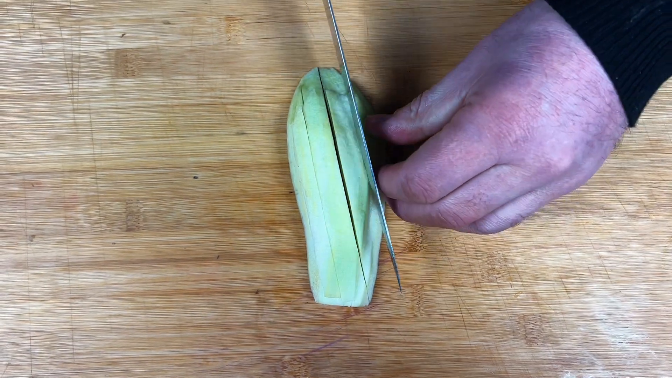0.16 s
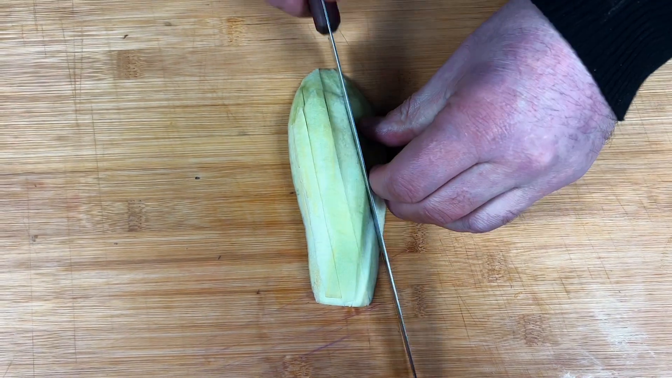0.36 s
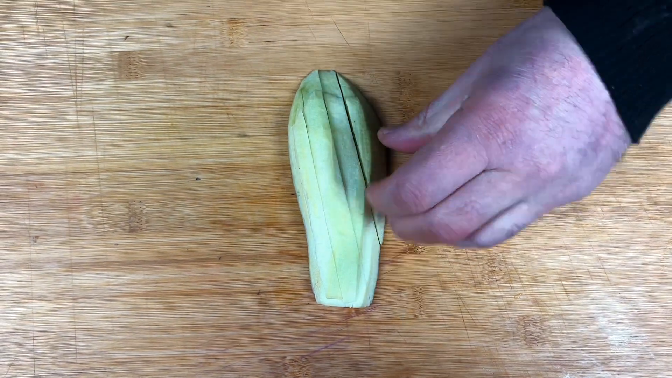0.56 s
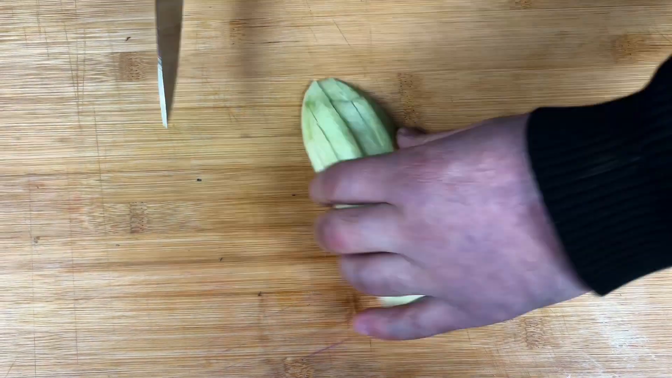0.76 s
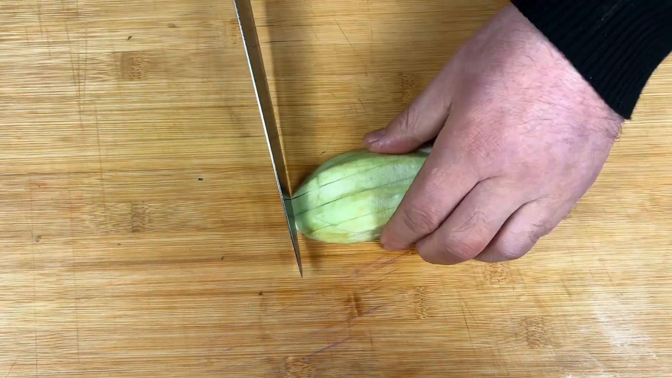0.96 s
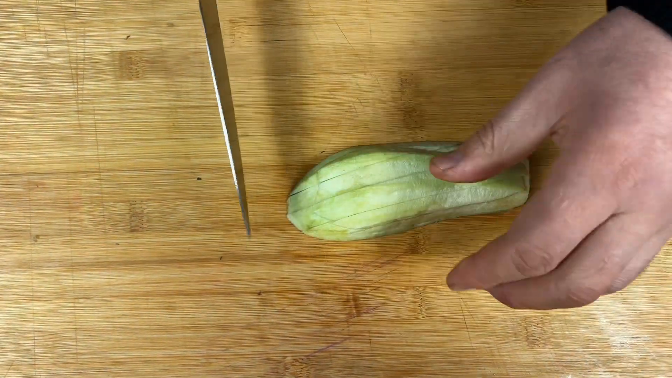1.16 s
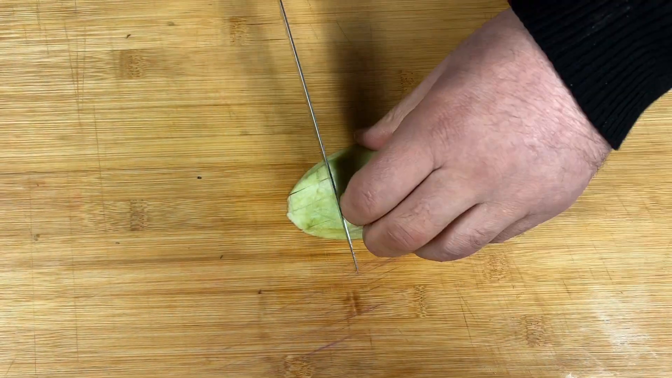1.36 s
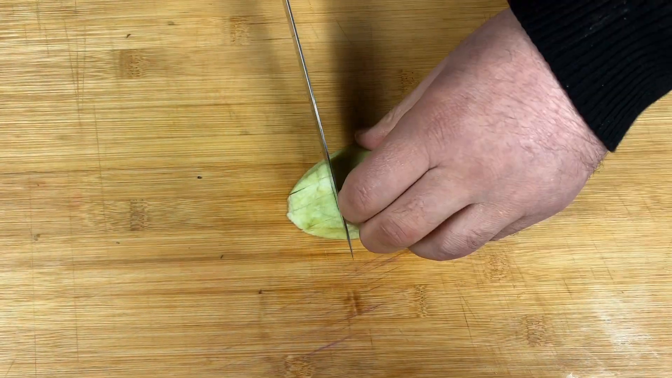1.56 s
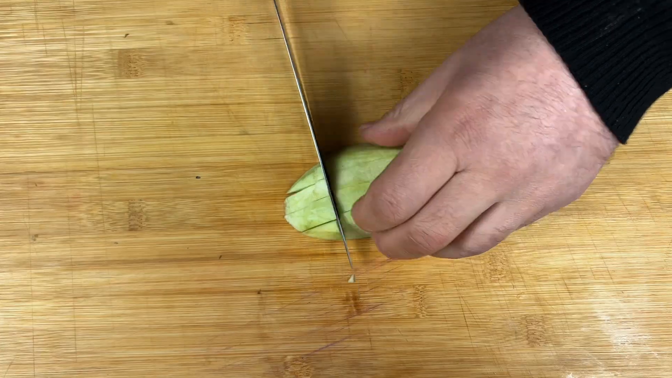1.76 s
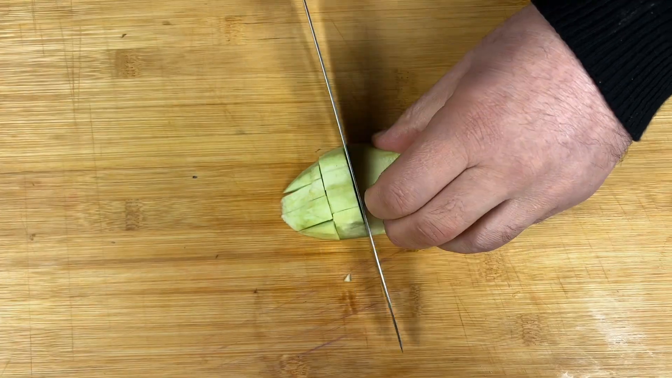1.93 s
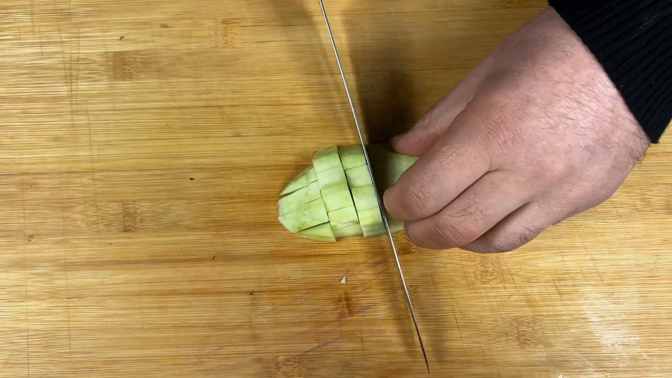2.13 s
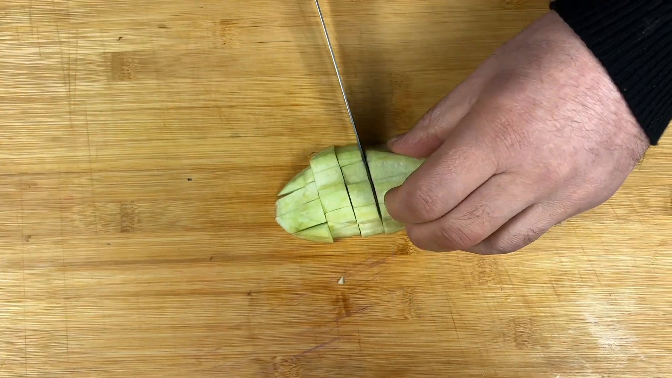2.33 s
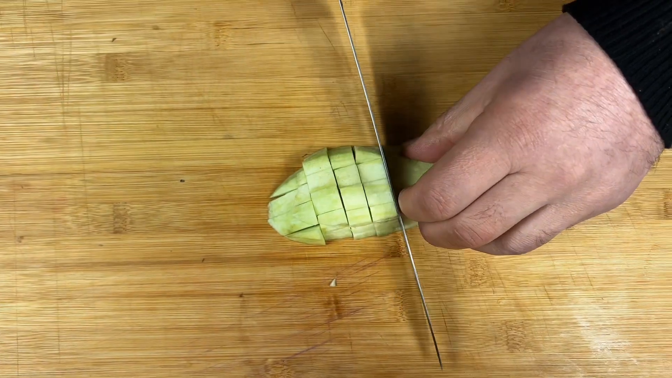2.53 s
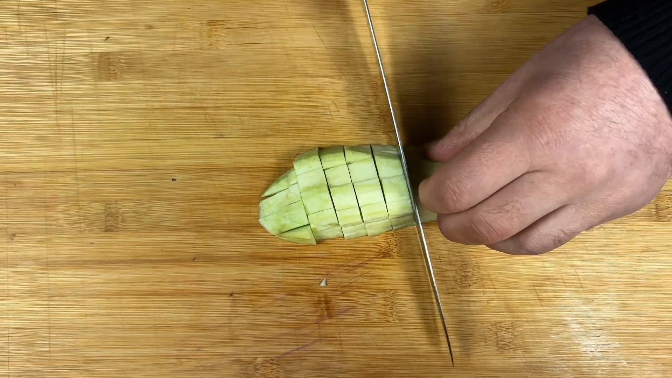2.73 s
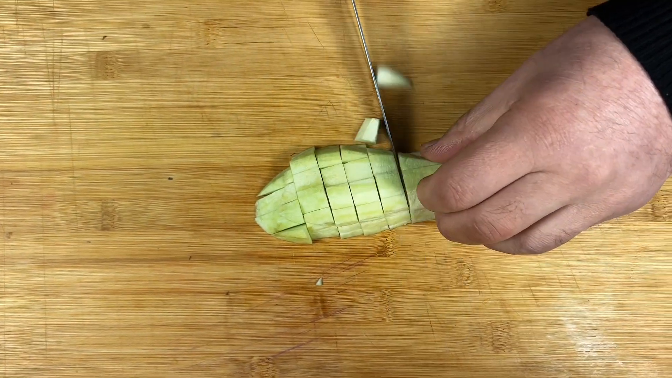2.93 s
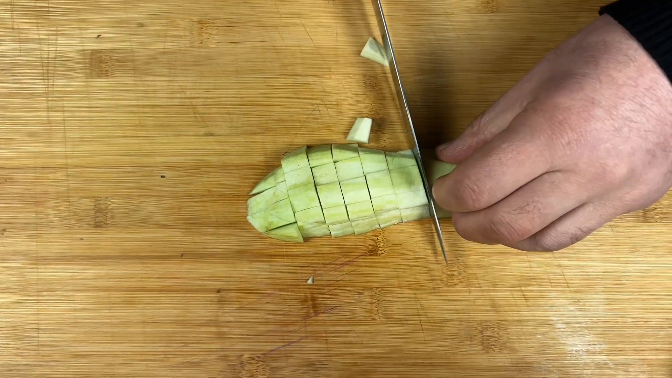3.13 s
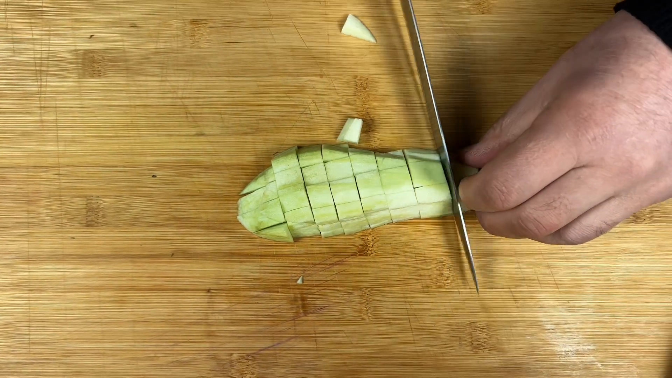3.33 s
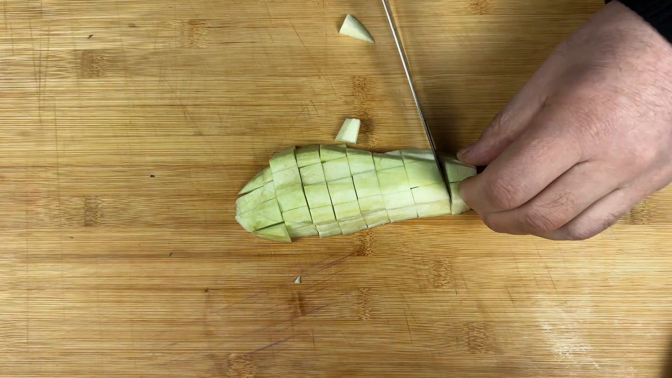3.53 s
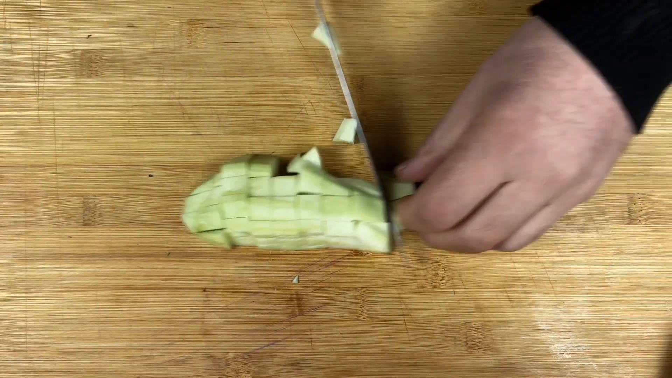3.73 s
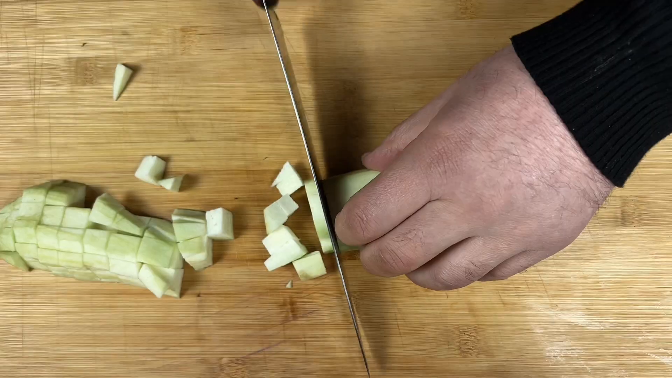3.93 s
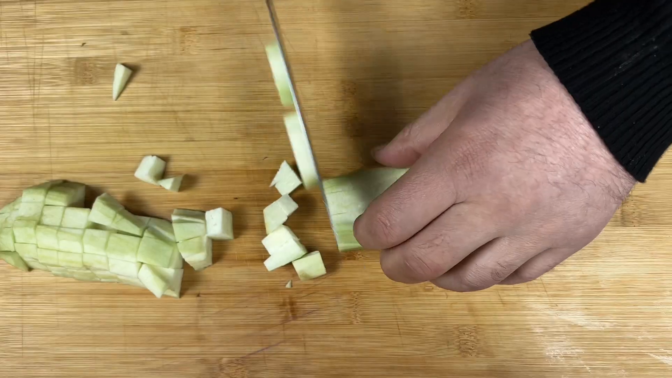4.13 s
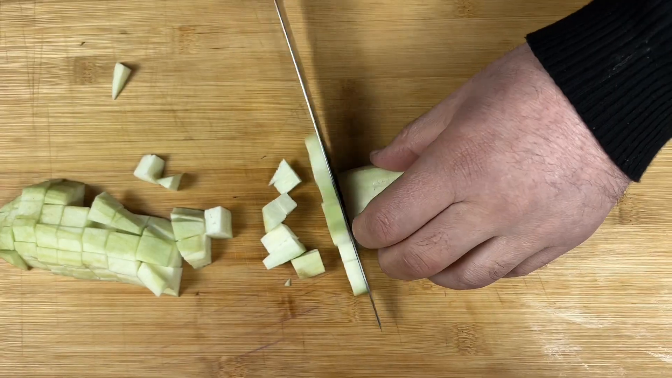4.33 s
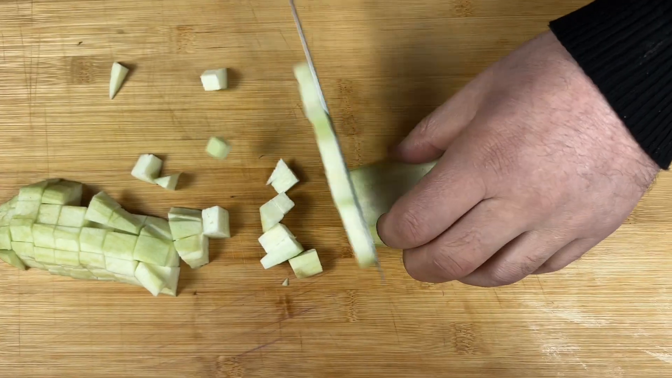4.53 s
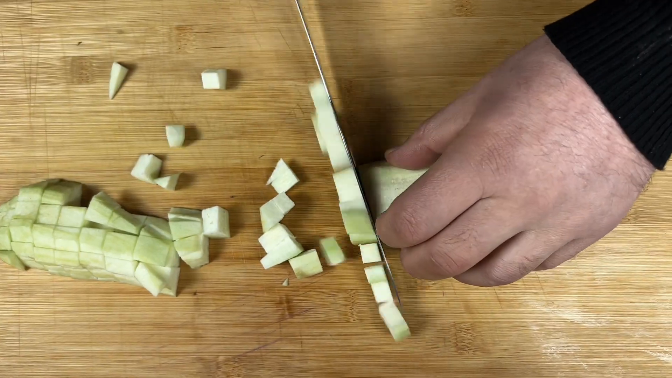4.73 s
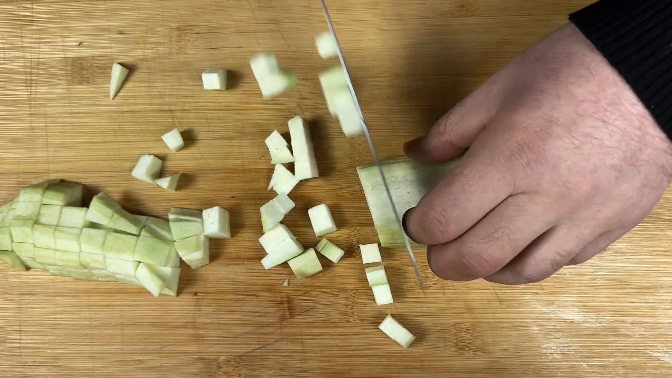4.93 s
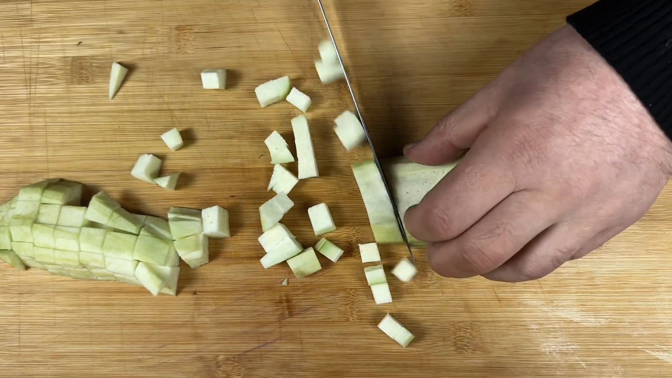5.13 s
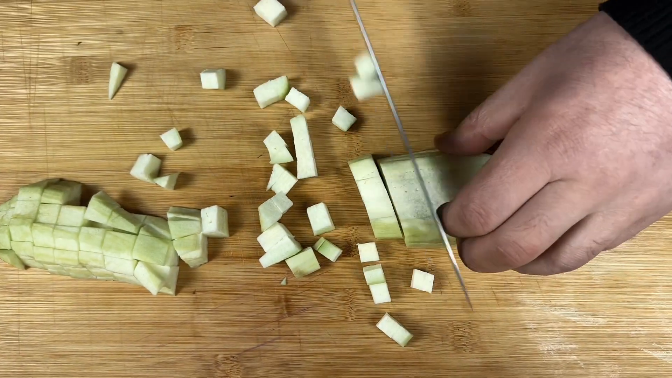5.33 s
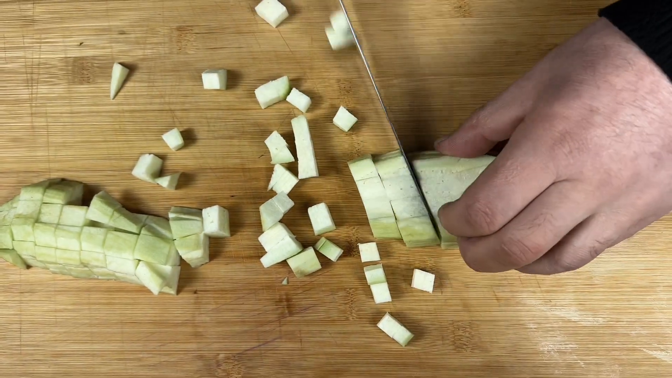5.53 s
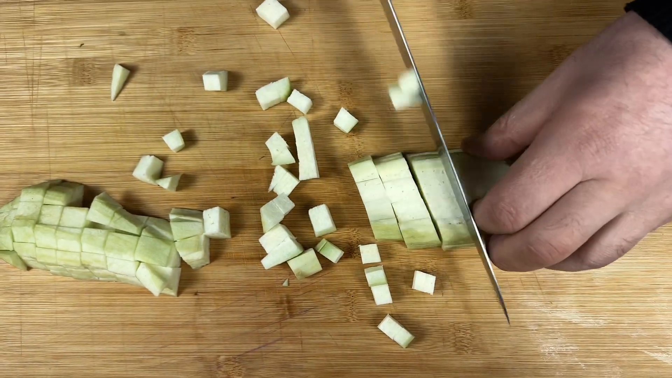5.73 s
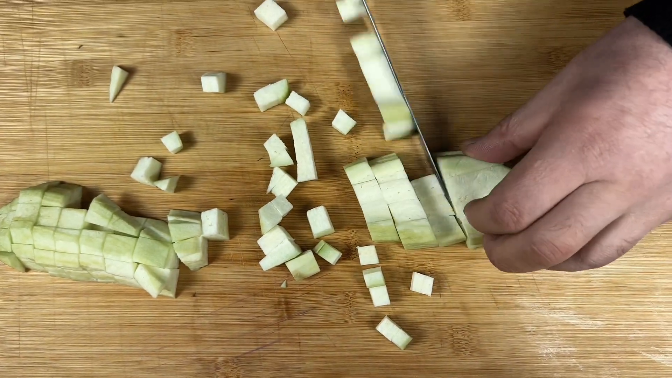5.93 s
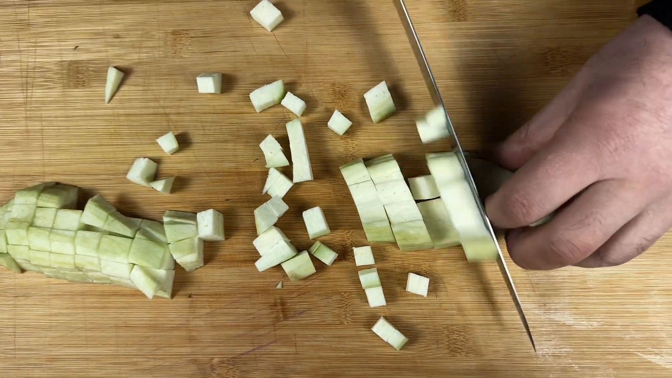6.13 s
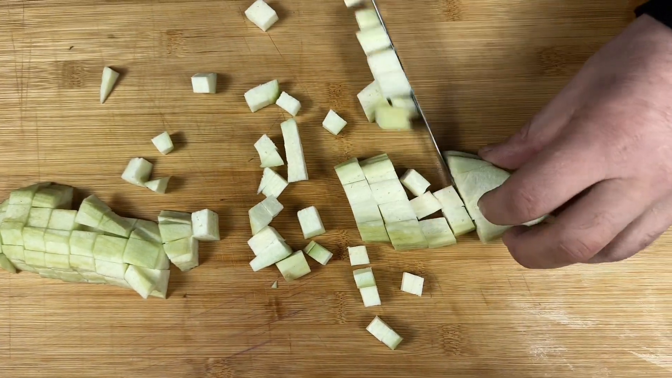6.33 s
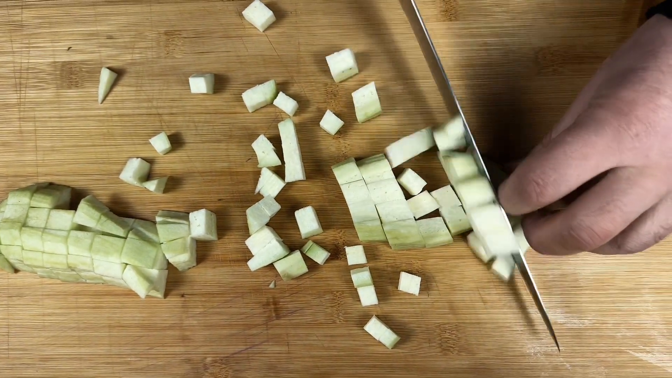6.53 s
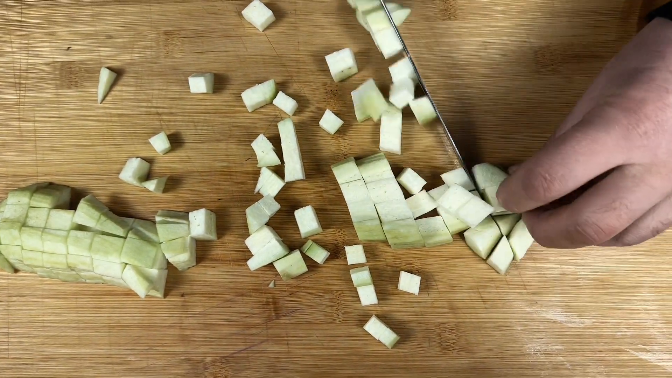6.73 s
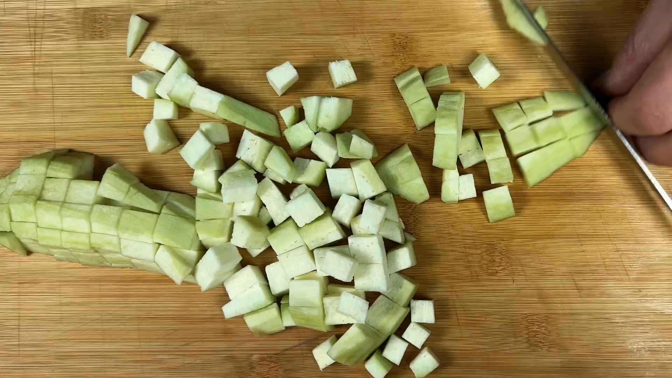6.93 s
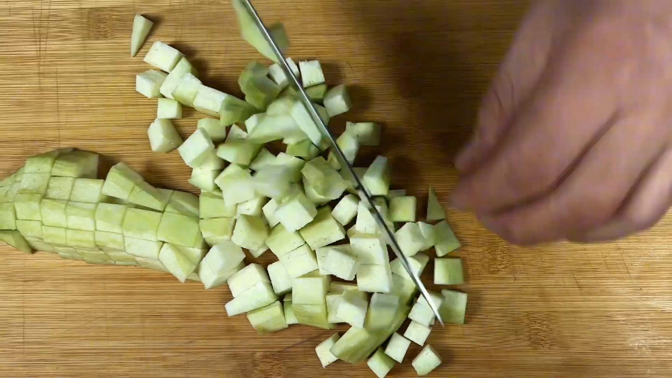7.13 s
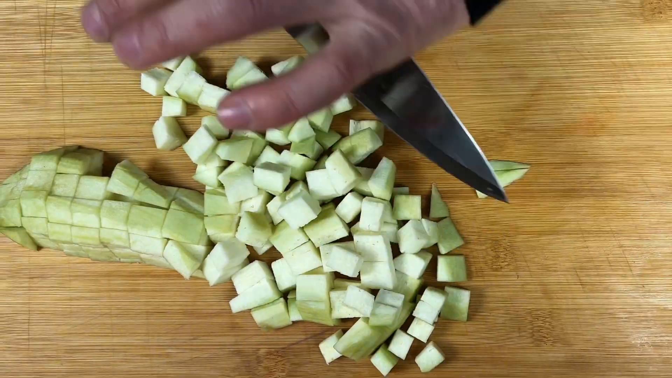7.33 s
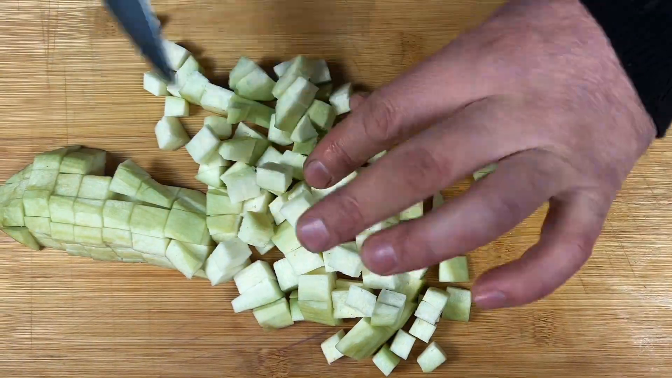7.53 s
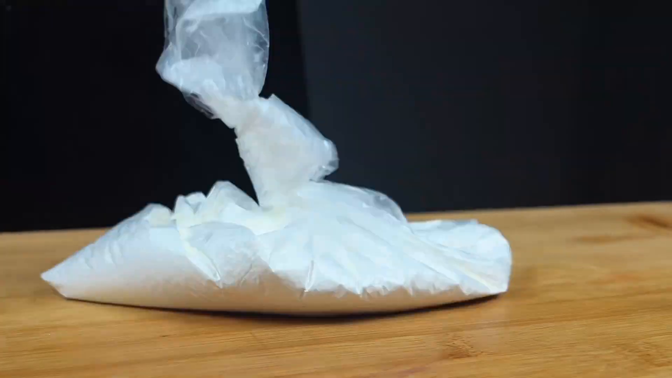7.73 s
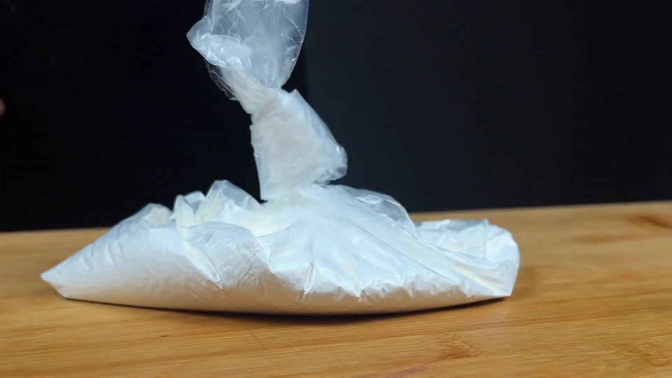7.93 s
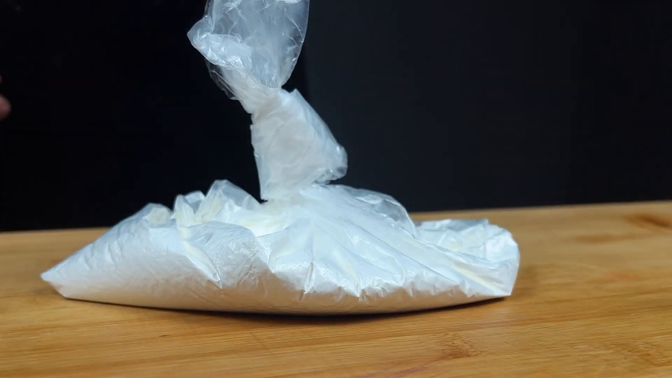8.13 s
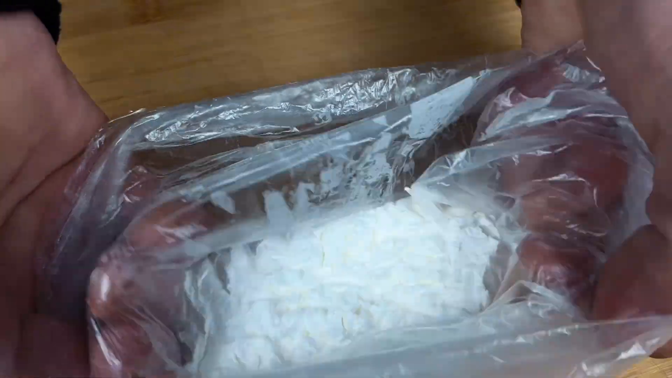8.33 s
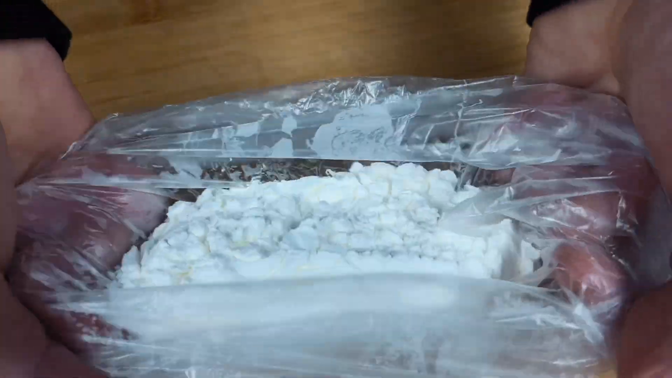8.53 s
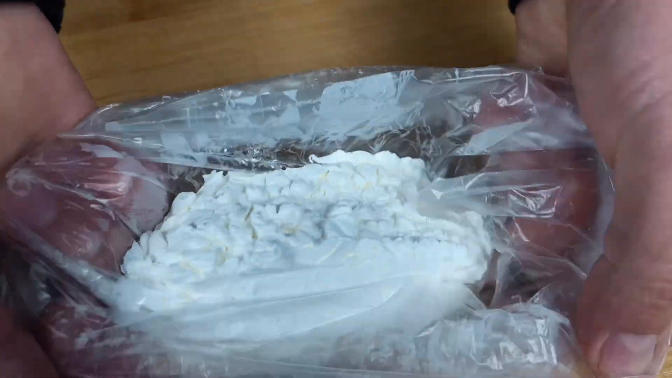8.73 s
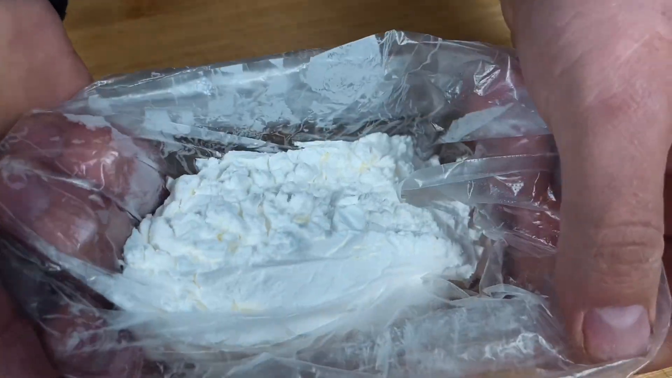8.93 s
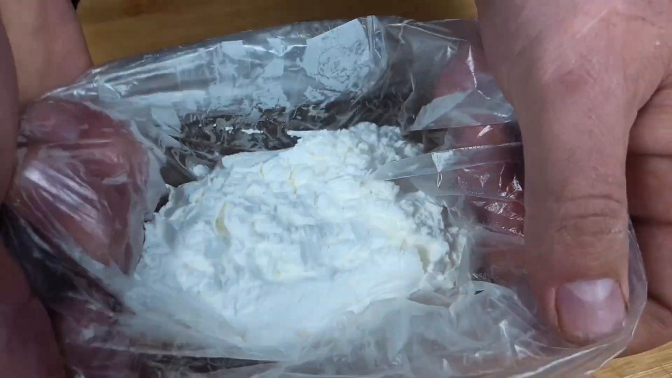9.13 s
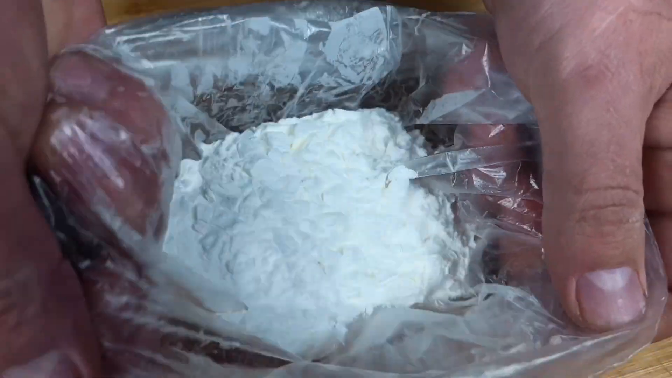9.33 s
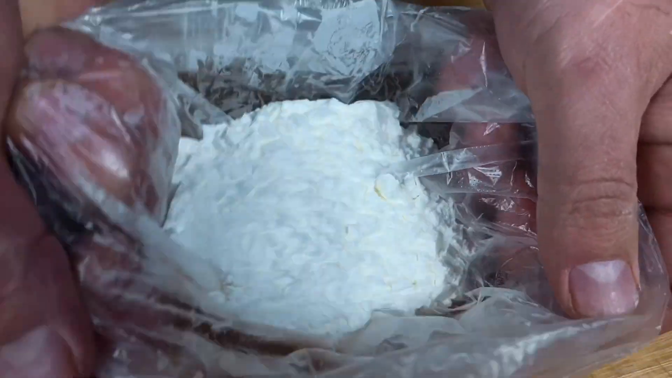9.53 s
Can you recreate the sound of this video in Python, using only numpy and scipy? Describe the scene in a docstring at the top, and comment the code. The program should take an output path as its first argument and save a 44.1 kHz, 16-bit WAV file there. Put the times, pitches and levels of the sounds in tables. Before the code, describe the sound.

A knife chops a vegetable on a wooden board, knocking sharply and rasping between cuts, then a soft bag thumps down and plastic crinkles close by.

```python
"""A knife slices a peeled vegetable on a wooden board in a quiet kitchen: the blade bites, knocks on the wood,
bounces and rasps back along the grain. Then a plastic bag of soft curd drops on the board,
and close by two hands spread the bag open. A spaced pair of microphones listens.
Knocks are ringing modes set off by clicks; rasp, rustle and crinkle are random grains, coloured and swelled.
Low shaking, a short kitchen echo and steady room air lie underneath."""
import sys
import numpy as np
from scipy import signal
from scipy.fft import rfft, irfft, next_fast_len
from scipy.io import wavfile

SR = 44100
rng = np.random.default_rng(int(sys.argv[2]) if len(sys.argv) > 2 else 0)


def wav_out(sig):
    """Save sig, one row per channel (or a flat mono array), as 16-bit PCM at SR to the path in sys.argv[1]."""
    wavfile.write(sys.argv[1], SR, np.round(np.clip(np.atleast_2d(sig).T, -1, 1) * 32767).astype(np.int16))


N = 426447
TIME = np.arange(N) / SR
STEPS = np.arange(0, N / SR + .01, .001)   # coarse clock for levels, in seconds
CUTOFF_HZ = 15900   # top of the sound
SHARP_FROM_HZ, DEEP_BELOW_HZ = 800, 250   # where the board's high modes begin and its lowest end
DROP_S = 7.669   # the bag hits the board

# Ways the board rings: [pitch_hz, level_db, t60_s, left_minus_right_db, left_leads_radians]
BOARD = [(178.6, -16.5, 0.38, 5.5, -0.5), (218, -13.5, 0.2, 6, -1), (311, -12, 0.11, -1, 1.1),
         (356.2, -0.5, 0.076, -2, 0.17), (382, 6.5, 0.027, 0.7, 0.13), (440, -11.5, 0.031, -3.5, -0.6),
         (446.2, -3, 0.1, 7, -0.07), (547, -14.5, 0.018, -12, 6.5), (712, 2, 0.045, -6, 4),
         (920, -3, 0.083, -5.5, -3), (1170, 3, 0.021, 11, -0.7), (1227, -4, 0.015, 4, -1.5),
         (1340, 0, 0.04, -2, 4), (1654, -3, 0.059, -6.5, -2.5), (2060, -4.5, 0.022, -2, -3),
         (2128, 4, 0.017, -2.5, 1), (2520, -9.5, 0.035, -4, 5), (3090, -10.5, 0.015, -3.5, 8),
         (3680, -16.5, 0.011, 0.5, -1)]
# Level of the board's lowest modes over time: [time_s, level_db]
DEPTH = [(0, -5.5), (1, -10), (1.7, -6.5), (2.2, 6.5), (2.8, -2), (3.3, 1), (3.8, 7.5), (4.3, -3),
         (5.4, -2.5), (6.2, 1.5), (6.6, -1.5), (7.5, 3)]
# Colour of a crack of steel edge on wood: [pitch_hz, relative_level_db]
CRACK = [(700, -30.5), (1500, -5.5), (3500, -2), (5000, -23), (8000, -34.5), (15500, -42)]
# The last fibres give way, the blade lands and grinds on the wood: [time_s, rise_s, fall_s (before its shares),
# rasp_db, keen_rasp_over_rasp_db, board_shudder_db, blade_hiss_db, table_shake_db]
LANDINGS = [(0.318, 0.027, .15, -29.5, -0.5, -27, -46, -61.5),
            (0.945, 0.023, 0.089, -44.5, -30, -40, -46, -67.5),
            (1.677, 0.026, 0.13, -26.5, -1, -21, -49, -67.5),
            (1.894, 0.007, 0.22, -22.5, -2.5, -20, -63, -51),
            (2.196, 0.0073, 0.32, -28.5, -7.5, -27, -51, -52),
            (2.524, 0.014, 0.21, -23, -12, -23, -51, -45),
            (2.786, 0.032, 0.24, -37, -32.5, -22, -75, -61.5),
            (3.011, 0.0036, 0.24, -22.5, -15, -14.5, -59, -48.5),
            (3.334, 0.0099, 0.31, -26.5, 2, -23, -44.5, -43.5),
            (4.306, 0.028, 0.14, -24, -11, -19.5, -37, -55),
            (4.634, 0.014, 0.13, -27, -3.5, -15.5, -72.5, -60),
            (5.032, 0.02, 0.055, -23.5, -15, -27, -66.5, -59),
            (5.404, 0.013, 0.13, -24, -17, -21, -63, -61), (5.792, 0.027, 0.1, -24.5, -25, -22, -56, -65),
            (6.202, 0.019, 0.19, -29.5, 7.5, -21, -42, -58),
            (6.608, 0.019, 0.088, -21.5, -12.5, -19.5, -47, -54)]
# Hands spread the bag: [time_s, crinkle_db, dull_handling_db]
SPREAD = [(8.149, -27.5, -40), (8.191, -25.5, -38.5), (8.347, -25, -41.5), (8.373, -18.5, -38.5),
          (8.385, -24, -37.5), (8.419, -30.5, -42.5), (8.521, -32.5, -49.5), (8.571, -28.5, -43),
          (8.657, -30, -44.5), (8.703, -29, -39), (8.741, -33, -46), (8.915, -36.5, -52), (8.999, -30, -42),
          (9.097, -33, -46), (9.121, -28, -40), (9.173, -36.5, -47.5), (9.245, -29.5, -40),
          (9.271, -34.5, -45.5), (9.309, -29.5, -45), (9.341, -35.5, -41), (9.367, -38.5, -50),
          (9.423, -29.5, -38), (9.447, -34, -45), (9.495, -30, -43.5), (9.557, -37.5, -48),
          (9.605, -27, -36), (9.639, -33, -40), (9.67, -29.5, -45)]


def from_db(db):
    """Decibels to gain."""
    return 10 ** (np.asarray(db) / 20)


def rms_one(x):
    """Scale to an rms of 1, over all channels together."""
    return x / np.sqrt(np.mean(x ** 2) + 1e-20)


def gains(rows):
    """Turn level columns into gains over time, practically silent outside the table."""
    s, *columns = np.transpose(rows)
    return [from_db(np.interp(TIME, s, c, left=-150, right=-150)) for c in columns]


def at_hz(points, hz):
    """Read a table at any pitch, along a log-frequency axis."""
    table_hz, values = np.array(points)[:, 0], np.array(points)[:, 1]
    return np.interp(np.log(hz), np.log(table_hz), values)


def swell(start, hold, rise, fall, bend=1):
    """Level in dB below full: rise up to the start, hold, fall; each time spans 30 dB if bend is 1."""
    early = np.maximum(start - STEPS, 0) / rise
    late = np.maximum(STEPS - start - hold, 0) / fall
    return -30 * (early + late) ** bend


def summed(levels_db):
    """Add levels as powers and return the gain at every sample."""
    return np.interp(TIME, STEPS, np.sqrt(np.sum(from_db(levels_db) ** 2, axis=0)))


def band(x, low_hz, high_hz):
    """Steep band-pass."""
    return signal.sosfilt(signal.butter(4, [low_hz, high_hz], "band", fs=SR, output="sos"), x)


def read_at(x, samples):
    """Read between samples."""
    return np.interp(samples, np.arange(N), x)


def ring(clicks, hz, t60):
    """A unit click sets a fading sine of starting height 1 ringing."""
    r, w = 1000 ** (-1 / (t60 * SR)), 2 * np.pi * hz / SR
    return signal.lfilter([0, np.sin(w)], [1, -2 * r * np.cos(w), r * r], clicks + 1e-18)


def drift(rate):
    """Slow random wandering of spread 1, made at every 40th sample; rate in Hz."""
    r = np.exp(-80 * np.pi * rate / SR)
    slow = signal.lfilter([1], [1, -2 * r, r * r], rng.standard_normal(N // 40 + 2002))[2000:]
    return np.interp(np.arange(N) / 40, np.arange(len(slow)), rms_one(slow))


def grains(per_s, spread_db, clump_db, smooth):
    """Two draws of random clicks of uneven size that come in clumps, over a share of smooth noise."""
    sizes = from_db(spread_db * np.minimum(rng.exponential(1, (2, N)), 5)) * rng.choice([-1, 1], (2, N))
    clumps = from_db(np.clip(clump_db, 0, 2.5) * drift(35))
    clicks = sizes * (rng.random((2, N)) < per_s / SR) * clumps
    return rms_one(clicks) + smooth * rng.standard_normal((2, N))


def coloured(pair, spectrum):
    """Shape two draws by a spectrum; bass is alike at both microphones, treble is not; rms 1."""
    # Likeness of left and right, held between 0 and 1 below: [pitch_hz, likeness (no unit)]
    likeness = [(60, 1), (180, 0.73), (550, 0.17), (1650, -1.3), (4970, -0.13), (15000, -0.13)]
    size = next_fast_len(N)
    hz = np.maximum(np.arange(size // 2 + 1) * SR / size, 1)
    alike = np.clip(at_hz(likeness, hz), 0, 1)
    mid, side = rfft(pair, size) * from_db(at_hz(spectrum, hz))
    both = np.sqrt(1 + alike) * mid + np.sqrt(1 - alike) * side * [[1], [-1]]
    return rms_one(irfft(both, size)[:, :N])


def patchy(x, low_hz, depth_db, rate):
    """Nine bands, each a third of an octave wide, from low_hz up swell and fade in their own time."""
    edges = low_hz * 2 ** np.arange(0, 3.1, 1 / 3)
    out = x
    for low, high in zip(edges, edges[1:]):
        part = signal.sosfilt(signal.butter(1, [low, high], "band", fs=SR, output="sos"), x)
        out = out + (from_db(depth_db * drift(rate)[-x.shape[1]:]) - 1) * part
    return rms_one(out)


def blows():
    """Each blow rings the board; sharp ones wake the high modes more, and the steel edge adds a crack."""
    # Blows on the board: [time_s, relative_peak_db, sharpness_db, left_minus_right_db]
    blow_rows = [(0.322, -8.5, -1.5, -7), (0.339, -31.5, -1.5, 1.5), (0.736, -42.5, -22, -9),
                 (0.932, -32, -17, 3), (0.938, -23.5, -22, 6), (0.946, -18, -21, 10.5),
                 (1.054, -45.5, -27, 1.5), (1.069, -54, -22, 0), (1.133, -65, -27, 0),
                 (1.148, -54, -25, -2), (1.164, -51, -14, -5), (1.678, -7.5, -5.5, -8),
                 (1.893, -4.5, -1, -7), (1.91, -10.5, -19, -2.5), (2.188, -19, -1, 11),
                 (2.523, -3, -4.5, -3.5), (2.542, -11.5, -11.5, 5), (2.785, -16, -16.5, 3.5),
                 (2.812, -15.5, -16, 0), (3.012, -5.5, 0, 6), (3.031, -12, -16, -2.5), (3.339, -11, 7, -3),
                 (3.361, -13, -25, -4), (3.796, -39.5, -17.5, -3), (3.812, -38.5, -8, 0),
                 (3.874, -42, -22, 4.5), (3.903, -38, -6, 1), (3.924, -31, -15, 3), (3.944, -27.5, -8, 2),
                 (4.213, -37.5, -28, 10), (4.307, -7.5, -1, 6), (4.557, -34.5, -16, 2),
                 (4.635, -4.5, -2.5, -2), (4.653, -25.5, -10, 6), (4.966, -28, -19, -6),
                 (5.032, -9, -4.5, -1.5), (5.05, -22.5, -22, -12), (5.355, -38, -26, 4),
                 (5.409, -6.5, -1.5, 0.5), (5.422, -26, -48, 5), (5.737, -46, -10, -10),
                 (5.791, -13.5, -16.5, 3), (5.8, -17, -6, 1), (6.116, -35, -30, -1.5),
                 (6.198, -19.5, -5, 12), (6.211, -10, 0, 8), (6.61, -12.5, -11.5, 1), (6.892, -35.5, 3, 8),
                 (6.98, -34.5, -5.5, -12), (7.486, -49, -29.5, 7.5)]
    s, peak_db, sharp_db, pan_db = np.transpose(blow_rows)
    at, out = np.round(s * SR).astype(int), np.zeros((2, N))
    sides = from_db(np.outer([.5, -.5], pan_db))
    luck = rng.standard_normal((len(at), len(BOARD), 3))
    depth = gains(DEPTH)[0][at]
    soft = np.exp(-1 / (0.00045 * SR))   # the flesh cushions the low push, which builds up later
    for k, (hz, level_db, t60, lean_db, lead) in enumerate(BOARD):
        high = hz > SHARP_FROM_HZ
        # each blow wakes the high modes in its own measure, by 2.5 dB or so
        strength = from_db(peak_db + level_db + high * (sharp_db - 1.0) + 2.5 * high * luck[:, k, 0])
        if hz < DEEP_BELOW_HZ:
            strength = strength * depth
        turn = lead + hz / 1800 * luck[:, k, 1]   # radians; each mode radiates its own way
        shift = np.round(turn * SR / (4 * np.pi * hz)).astype(int)   # half the lead, for either side
        lean = from_db(lean_db * np.array([.5, -.5]))
        clicks = np.zeros((2, N))
        heights = 0.41 * strength * lean[:, None] * (sides if high else 1)
        clicks[0, at - shift], clicks[1, at + shift] = heights
        if not high:
            clicks = signal.lfilter([2.09 * (1 - soft) ** 2], [1, -2 * soft, soft ** 2], clicks)
        out += ring(clicks, hz, t60)
    cracks = np.zeros((2, N))
    cracks[:, at] = from_db(peak_db + sharp_db - 21.5) * sides
    fade = np.exp(-1 / (0.0032 * SR))   # the crack lasts a few milliseconds
    bright = coloured(rng.standard_normal((2, N)), CRACK)
    # keep the knocks lean below 245 Hz
    return band(out, 245, 6600) + signal.lfilter([1], [1, -fade], cracks) * bright


def strokes():
    """Flesh tearing under the blade shakes the low modes; the edge dragging on the grain rasps and hisses."""
    # Blade and board under friction: [pitch_hz, damping_per_s (higher rings shorter), level_db]
    resonances = [(674, 31, 4), (1104, 140, 3.5), (1480, 14, -16.5), (1865, 45, 2.5), (2198, 22, 1.5),
                  (2310, 54, -16), (2900, 74, -24.5), (3310, 62, -9.5), (3640, 180, -10),
                  (4500, 140, -20.5), (5200, 220, -15), (6000, 44, -21.5)]
    # Colour of the rasp under these resonances: [pitch_hz, relative_level_db]
    rasp_bed = [(350, -23), (600, -5.5), (1000, -4), (1500, -5), (2200, -3), (2900, -11), (3600, -17.5),
                (5000, -36.5)]
    # Colour of the blade's hiss: [pitch_hz, relative_level_db]
    hiss_colour = [(1800, -33), (2600, -10), (4200, -12), (5400, -11), (7200, -18), (9000, -20.5),
                   (12000, -29), (15500, -29.5)]
    # Hiss above 6 kHz against the rest of it: [time_s, level_db]
    treble = [(0, -1.5), (.5, -1.5), (1.7, 1), (2.1, -4.5), (2.7, 0.5), (3.2, -3.5), (3.6, -6.5), (4, 1.5),
              (4.35, -0.5), (4.75, 3), (5.15, -1), (5.5, 0.5), (5.9, 1), (6.3, 0.5), (6.7, 2.5), (6.95, 12),
              (7.6, -6)]
    rasp_gain, keen_gain, shudder_gain, hiss_gain = contact()

    tears = grains(400, spread_db=2.0, clump_db=0.0, smooth=0.13)
    tears = tears[0] + 0.14 * tears[1] * [[1], [-1]]
    depth, low = gains(DEPTH)[0], 0
    for hz, db, t60, *_ in BOARD:
        if hz < SHARP_FROM_HZ:
            low = low + from_db(db) * (depth if hz < DEEP_BELOW_HZ else 1) * ring(tears, hz, 1.1 * t60)

    drag = grains(1500, spread_db=1.5, clump_db=0.7, smooth=0.47)
    # the contact point travels along the blade, so each resonance sings out for a moment and glides
    singing = 0
    for hz, damping, db in resonances:
        moment = from_db(db + 4.0 * drift(7.3))
        # friction damps every resonance, so none goes below 50 per second
        singing = singing + moment * rms_one(ring(drag, hz, 7.5 / max(damping, 50)))
    glide = np.arange(N) + np.cumsum(.03 * drift(4.0))
    singing = rms_one(np.array([read_at(ear, glide) for ear in singing]))
    singing = rms_one(singing + .9 * streaks(drag))

    drag = patchy(coloured(drag, rasp_bed), 508, depth_db=2.0, rate=24) + 1.2 * singing
    dull, keen = band(drag, 410, 1500), band(drag, 1500, 4500)
    fine = coloured(grains(6500, spread_db=-3.0, clump_db=4.0, smooth=0.86), hiss_colour)
    fine = patchy(fine + 1.8 * band(singing, 2100, 4900), 1800, depth_db=1.5, rate=36)
    fine = fine + (gains(treble)[0] - 1) * band(fine, 6000, CUTOFF_HZ)
    shaken = shudder_gain * rms_one(band(low, 200, 610))
    return shaken + rasp_gain * rms_one(dull) + keen_gain * rms_one(keen) + hiss_gain * fine


def contact():
    """Bites, landings and slides set the gains of dull rasp, keen rasp, shudder and hiss."""
    # The blade bites into the flesh and presses down: [start_s, length_s, swell_db, rasp_db,
    # keen_rasp_over_rasp_db, board_shudder_db, blade_hiss_db]
    bites = [(0.248, 0.061, 14, -49, -18, -42, -50), (1.587, 0.076, 30, -48.5, -5, -34.5, -49),
             (1.879, 0.014, -3, -39.5, -1, -32, -49), (2.449, 0.064, 13.5, -46.5, -3, -32, -45),
             (4.196, 0.058, 15.5, -50.5, -2.5, -38.5, -52), (4.558, 0.057, 18.5, -51, -4, -33.5, -51.5),
             (4.961, 0.054, 2.5, -54, -12, -39, -53.5), (5.353, 0.059, 3, -51, -5, -41, -51),
             (5.739, 0.054, 6, -51.5, -3, -39, -49.5), (6.11, 0.055, 8.5, -53, -1, -43, -52.5),
             (6.493, 0.063, 15, -49, -0.5, -35, -48.5), (6.892, 0.11, 4.5, -44.5, -2, -40.5, -49)]
    # Blade or vegetable slides over the board: [fastest_at_s, rise_s, fall_s (both before the shares below),
    # rasp_db, keen_rasp_over_rasp_db, board_shudder_db, blade_hiss_db]
    slides = [(.114, 0.013, 0.08, -90, -4, -65, -97), (.5, 0.2, 0.19, -45.5, 5.5, -49, -43),
              (.735, 0.0058, 0.022, -75, -6.5, -48.5, -64), (.814, 0.11, 0.22, -63, -4, -58, -69),
              (1.062, 0.026, 0.036, -83, -13, -54, -90), (1.16, 0.05, 0.053, -78, 6, -64, -78),
              (1.812, 0.16, 0.15, -39.5, 1.5, -47, -46), (2.09, 0.3, 0.19, -37.5, 1.5, -44, -46.5),
              (2.33, 0.3, 0.22, -37, -3.5, -44, -43), (2.671, 0.24, 0.27, -40, -2.5, -41, -43),
              (2.899, 0.19, 0.28, -38, -3, -45, -42.5), (3.18, 0.25, 0.26, -41, 3, -42.5, -46),
              (3.44, 0.21, 0.43, -43, -2, -43, -57), (3.63, 0.11, 0.06, -65, 0, -42.5, -57),
              (3.836, 0.26, 0.38, -71, 5.5, -49, -58), (3.988, 0.18, 0.17, -39.5, -1, -49, -43.5),
              (4.36, 0.08, 0.18, -37.5, -7, -60, -48.5), (4.754, 0.24, 0.16, -42, -0.5, -53, -47),
              (4.93, 0.12, 0.082, -71.5, -1, -60, -86), (5.126, 0.19, 0.18, -41.5, 2.5, -52.5, -46.5),
              (5.519, 0.21, 0.17, -43.5, 3.5, -64, -49.5), (5.89, 0.19, 0.17, -43.5, 4, -51, -46.5),
              (6.269, 0.071, 0.22, -39.5, -0.5, -53, -52), (6.46, 0.051, 0.085, -74, -2, -58.5, -87),
              (6.676, 0.23, 0.15, -44.5, 2, -53, -50), (6.85, 0.099, 0.066, -66, -5, -56.5, -86),
              (7.077, 0.098, 0.064, -71, 4, -51.5, -77), (7.495, 0.028, 0.041, -76, -12, -50, -92),
              (7.545, .03, 0.067, -70.5, -9, -56.5, -96.5)]
    # Share of the fall after a landing: one value (no unit) each for dull rasp, keen rasp, shudder, hiss
    landing_fall = [1.0, 0.74, 0.4, .5]
    # Share of a slide's rise and fall: one value (no unit) each for the same four layers
    slide_width = [0.92, 0.82, 0.93, 0.75]
    roundness = 1.58   # 1 is a pointed swell, 2 a round one

    def level(k, rasp, keen, shudder, hiss):
        """Pick the level of layer k; keen rasp is given relative to rasp."""
        return [rasp, rasp + keen, shudder, hiss][k]

    result = []
    for k in range(4):
        layer = []
        for s, length, swell_db, *db in bites:
            grow = swell_db * (np.clip((STEPS - s) / length, 0, 1) - 1)
            layer.append(level(k, *db) + grow + swell(s, length, 0.005, 0.042))
        for s, rise, fall, *db, _ in LANDINGS:   # full pressure for 3.3 ms
            layer.append(level(k, *db) + swell(s, 0.0033, rise, fall * landing_fall[k]))
        for s, rise, fall, *db in slides:
            width = slide_width[k]
            layer.append(level(k, *db) + swell(s, 0, rise * width, fall * width, roundness))
        result.append(summed(layer))
    return result


def streaks(drag):
    """Many thin modes of the blade, each waking for a moment as the edge drags; strongest near 1.5 kHz."""
    out = 0
    for hz in np.geomspace(850, 5800, 23) * rng.uniform(.97, 1.03, 23):
        moment = from_db(5.5 * drift(7) - 6.0 * abs(np.log2(hz / 1500)))
        out = out + moment * rms_one(ring(drag, hz, .065))
    return rms_one(out)


def squeaks():
    """The wet blade sings: friction noise gathers in one narrow resonance, partly alike at both microphones."""
    # Moments of singing: [start_s, length_s, pitch_hz, level_db]
    songs = [(0.438, 0.011, 1570, -37.5), (.49, 0.074, 5300, -54), (.51, 0.058, 3500, -53),
             (2.048, 0.027, 2450, -39), (2.207, 0.017, 1170, -31), (2.302, 0.036, 3540, -45),
             (2.323, 0.013, 2870, -43), (2.368, 0.04, 2210, -44), (2.642, 0.052, 3550, -48),
             (2.673, 0.075, 1040, -38), (2.733, 0.0091, 2370, -41), (2.859, 0.023, 2100, -32),
             (2.968, 0.02, 1040, -38), (3.103, 0.015, 3100, -46), (3.163, 0.049, 3570, -48),
             (3.202, 0.045, 5100, -53.5), (5.484, 0.024, 2200, -39.5), (5.868, 0.048, 2170, -47)]
    edge_s, ring_s = 0.025, 3.6 / 260
    out, noise = np.zeros((2, N)), rng.standard_normal((2, N))
    noise = noise[0] + 0.47 * noise[1] * [[1], [-1]]
    for s, length, hz, db in songs:
        near = slice(round((s - .1) * SR), round((s + .2) * SR))
        gain = summed([db + swell(s, length, edge_s, edge_s, 1.1)])
        out[:, near] += gain[near] * rms_one(ring(noise[:, near], hz, ring_s))
    return out


def drop():
    """A soft heavy load thumps board and table and slumps on, its film slaps and then settles."""
    # Board and table under a soft load: [pitch_hz, level_db, t60_s]
    table_modes = [(48, -26, 0.39), (70, -6.5, 0.076), (95, -7.5, 0.075), (110.6, -10.5, 0.25),
                   (175.4, -7.5, 0.49), (199, 10.5, 0.045), (211.3, -13.5, 0.52), (225, -18, 0.47),
                   (256, -1.5, 0.14), (299, -8.5, 0.2), (325, -9, 0.089), (350, -5, 0.17), (367, -12, 0.36),
                   (400, -8.5, 0.25), (408, -13, 0.16), (414, -14, 0.14), (517, -32, 0.23),
                   (700, -28, 0.46), (915, -12, 0.17), (1004, -6.5, 0.059)]
    # Colour of the settling film: [pitch_hz, relative_level_db]
    settle_tone = [(60, -40.5), (300, 2.5), (500, -1), (900, -7.5), (3500, -15), (8700, -18.5),
                   (12000, -27), (15500, -24.5)]
    push = np.zeros(N)
    push[round(DROP_S * SR)] = 1
    slump = signal.lfilter([1], [1, -np.exp(-1 / (.06 * SR))], push) * rng.standard_normal((2, N))
    slump = slump[0] + 0.22 * slump[1] * [[1], [-1]]
    top = from_db(-11) * np.roll(push, round(0.015 * SR))   # the top of the load comes down after the bottom
    load = push + top + .028 * slump   # a small share keeps shifting
    thump = 0
    for hz, db, t60 in table_modes:
        side_db = np.interp(hz, [60, 170], [6.5, .8]) * np.array([[1], [-1]])   # lowest modes lean left
        tone = ring(load, hz, t60)
        if hz < 185:   # the table top answers 13 ms later than the board
            tone = np.roll(tone, round(0.013 * SR), axis=1)
        else:
            tone = band(tone, 140, 2800)
        thump = thump + from_db(-17.5 + db + side_db) * tone
    film = coloured(grains(5500, spread_db=-1.0, clump_db=-5.0, smooth=1.0), settle_tone)
    slap = from_db(-4) * signal.lfilter([1], [1, -np.exp(-1 / (0.0013 * SR))], push)
    slap = slap * coloured(rng.standard_normal((2, N)), CRACK)
    return band(thump, 42, 2500) * (TIME < SPREAD[0][0]) + slap + settling(film)


def settling(film):
    """A faint rustle swells just before the thump; the film bursts, settles and ticks until hands take over."""
    # Burst and slow settling after the drop: [fall_s, level_db]
    falls = [(0.056, -10.5), (.27, -29.5)]
    # Folds snap: [time_s, relative_peak_db]
    ticks = [(7.598, -42), (7.867, -45), (7.888, -41.5), (8.0276, -54.5), (8.112, -53.5), (8.1204, -53)]
    parts = [db + swell(DROP_S, 0, 0.0021, fall) for fall, db in falls]
    parts += [-46.5 + swell(DROP_S, 0, 0.1, .01)]   # rises into the thump
    tick_levels = [db + swell(s, 0.0012, .001, 0.0075) for s, db in ticks]
    bright = rms_one(band(film, 4100, CUTOFF_HZ))
    return (summed(parts) * film + summed(tick_levels) * bright / 2) * (TIME < SPREAD[0][0])


def spread():
    """Thin film buckles in thousands of tiny snaps, heard first at the left; the hands add a dull rub."""
    # Colour of the crinkling film: [pitch_hz, relative_level_db]
    crinkle_colour = [(400, -39), (700, -14), (2200, -7), (3800, -3.5), (7200, -5.5), (8800, -1),
                      (12000, -1.5), (15500, -2.5)]
    # Colour of the rubbing hands: [pitch_hz, relative_level_db]
    handling_colour = [(41, -41), (70, -7), (501, -8), (787, -7), (1100, -2.5), (1310, -12), (1400, -1),
                       (1820, -68), (3080, -120)]
    # Stiff folds snap open: [time_s, level_db]
    stiff_folds = [(8.3684, -22), (8.39, -23), (8.558, -30), (8.607, -29), (8.692, -36), (8.999, -37),
                   (9.1162, -30), (9.5843, -28)]
    crinkle, handling = gains(SPREAD)
    snaps = coloured(grains(3500, spread_db=2.5, clump_db=1.0, smooth=0.48), crinkle_colour)
    start = round(SPREAD[0][0] * SR)
    snaps[:, start:] = patchy(snaps[:, start:], 1150, depth_db=1.5, rate=29)
    # the bag lies nearer the left microphone:
    # the right side follows about half a millisecond later, wavering slightly
    late = np.round(SR * (.00048 + .000008 * drift(1.3))).astype(int)
    near = np.array([snaps[0], snaps[0][np.arange(N) - np.maximum(late, 0)]])
    # snaps from all over the bag: the left reads them a second apart, so the sides are unlike
    dull = signal.sosfilt(signal.butter(2, 7000, fs=SR, output="sos"), snaps[1])
    around = np.array([np.roll(dull, SR), dull])
    snaps = rms_one(near * from_db([[.4], [-.4]]) + 2.42 * around)
    rub = coloured(grains(1500, spread_db=1.0, clump_db=2.0, smooth=0.5), handling_colour)
    folds = summed([db + swell(s, 0.0012, .001, 0.005) for s, db in stiff_folds])
    return np.hypot(crinkle, folds) * snaps + handling * rub


def rumble():
    """Lumpy low noise shakes the table with landings, drop and hands, stronger at the left microphone."""
    # A hand leans on the table: [time_s, level_db]
    nudges = [(.03, -69), (.065, -70), (.155, -54), (.74, -61), (3.799, -62), (6.95, -67), (7.5, -70)]
    low = band(rng.standard_normal((2, N)), 38, 90)
    shakes = [row[-1] + swell(row[0], 0, 0.25, 0.45) for row in LANDINGS]
    shakes += [-49 + swell(DROP_S, 0.035, 0.025, 0.1)]
    shakes += [-88 + 0 * STEPS]   # the table at rest
    shakes += [db + swell(s, 0, 0.081, .08) for s, db in nudges]
    gain = summed(shakes) + from_db(-15.5) * gains(SPREAD)[1]
    return gain * rms_one(low[0] * from_db([[3.0], [-5.0]]) + 0.47 * low[1] * [[0], [1]])


def kitchen(x):
    """Echo between the walls: eight feedback delays a side, duller on every round."""
    t60_s, wall_cut_hz = .38, 4200   # the bass rings for t60_s, the treble shorter
    size = next_fast_len(N + SR)
    w = 2 * np.pi * np.arange(size // 2 + 1) / size
    dull = 1 / (1 + 1j * w * SR / (2 * np.pi * wall_cut_hz))
    answer = np.zeros((2, len(w)), complex)
    for k, lag in enumerate(rng.uniform(.009, .03, 16) * SR):
        loop = 1000 ** (-lag / SR / t60_s) * dull * np.exp(-1j * w * lag)
        answer[k % 2] += (-1) ** (k // 2) * loop / (1 - loop)   # all rounds of this echo at once
    return irfft(rfft(x, size) * answer, size)[:, :N]


def air():
    """The steady hush of the room is coloured noise, brighter at the left microphone."""
    # Colour of the hush: [pitch_hz, relative_level_db]
    hush = [(18, -45.5), (30, -19), (59, -10.5), (113, -7), (200, 3), (234, -10.5), (346, -7), (404, -21.5),
            (859, -21), (1410, -15), (1560, -7), (1970, -15), (4420, -30.5), (7430, -16), (8690, -34.5),
            (10200, -36), (15000, -46.5), (22000, -120)]
    # Its lean to the left: [pitch_hz, left_minus_right_db]
    air_lean = [(400, 1), (1200, 10), (2500, 4.5), (4500, 11), (8000, 10), (12000, 1.4)]
    hz = np.maximum(np.arange(N // 2 + 1) * SR / N, 1)
    lean = from_db(at_hz(air_lean, hz) * np.array([[.5], [-.5]]))
    noise = coloured(rng.standard_normal((2, N)), hush)
    return from_db(-72) * irfft(rfft(noise) * lean, N)


def scene():
    """Knife and bag in the kitchen air; only blows and drop feed the echo."""
    knocks = blows() + drop()
    echo = from_db(-26.5) * kitchen(band(knocks, 130, 9000))
    return knocks + echo + strokes() + squeaks() + spread() + rumble() + air()


def record(dry):
    """Peaks are rounded, the top is cut."""
    rounded = 1.1 * np.tanh(dry / 1.1)
    return signal.sosfilt(signal.ellip(10, .5, 80, CUTOFF_HZ, fs=SR, output="sos"), rounded)


dry = scene()
out = record(dry)
wav_out(out)
```